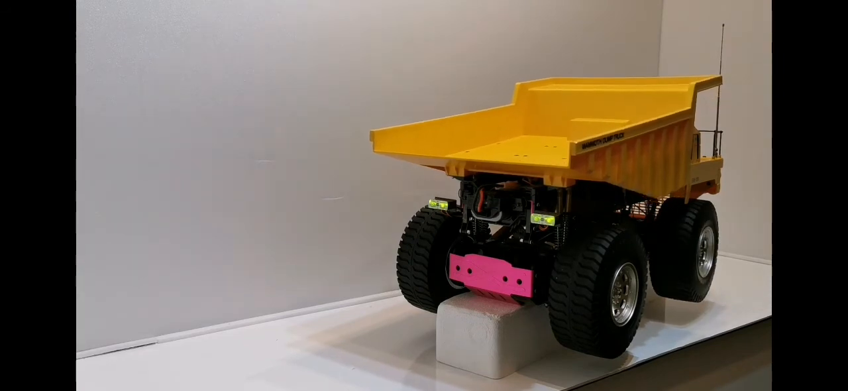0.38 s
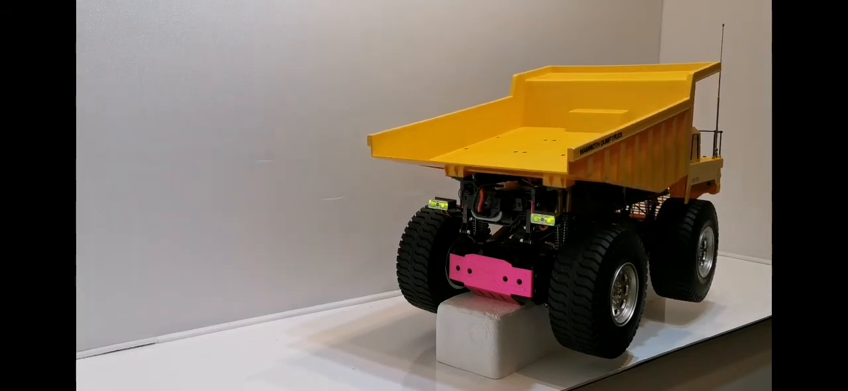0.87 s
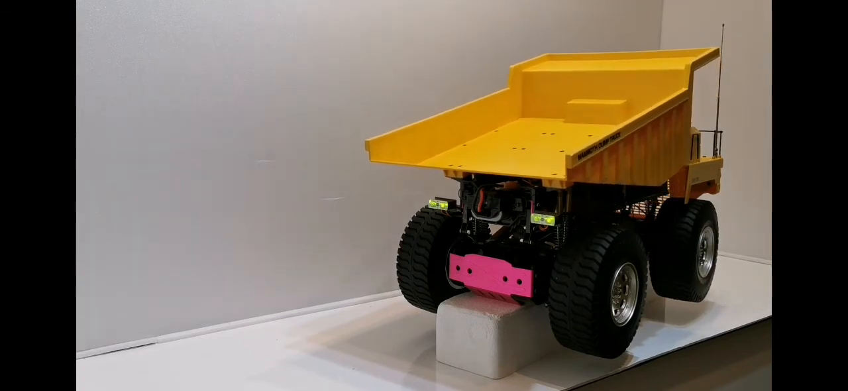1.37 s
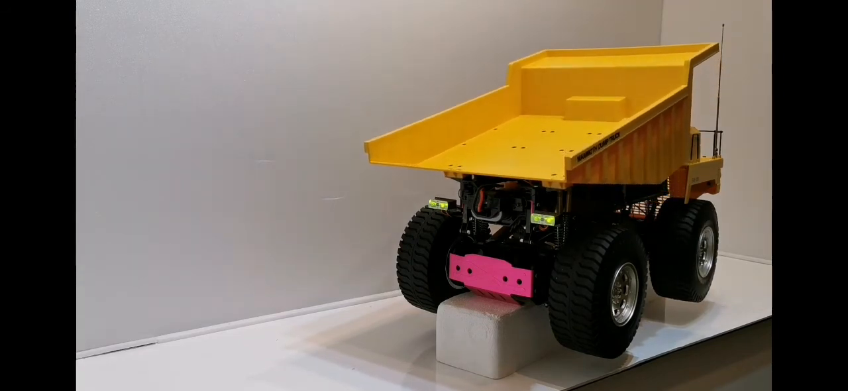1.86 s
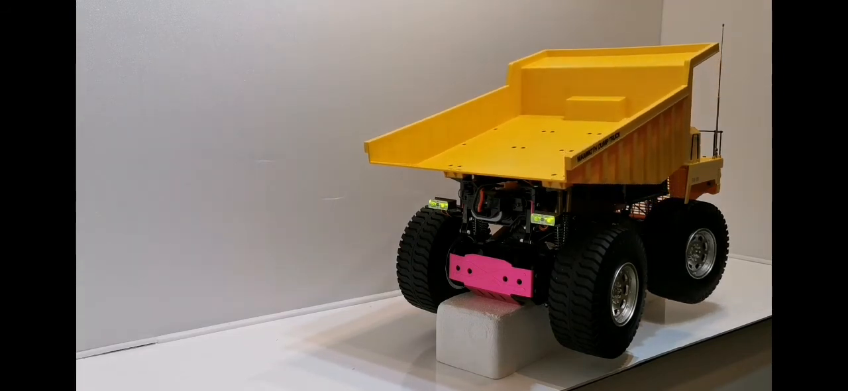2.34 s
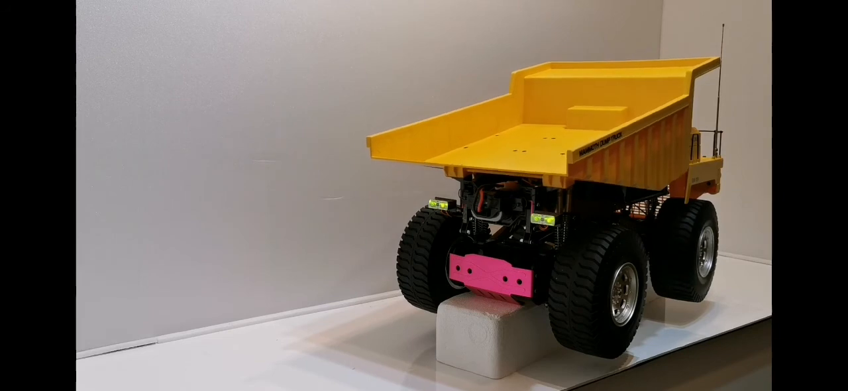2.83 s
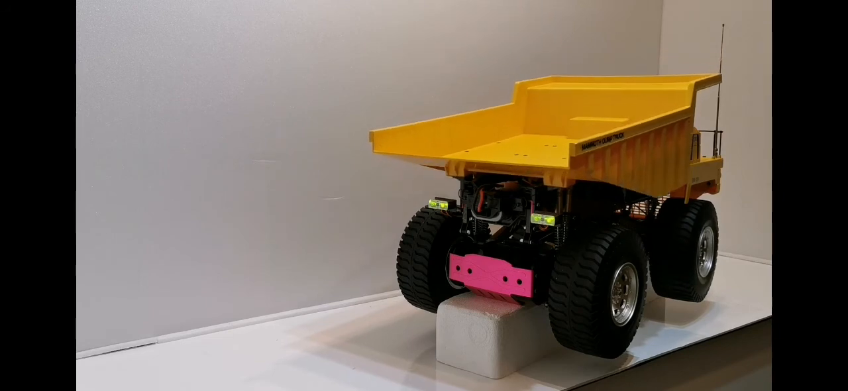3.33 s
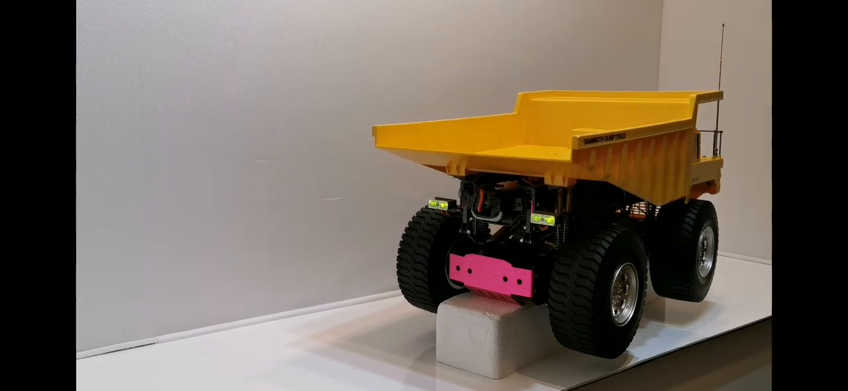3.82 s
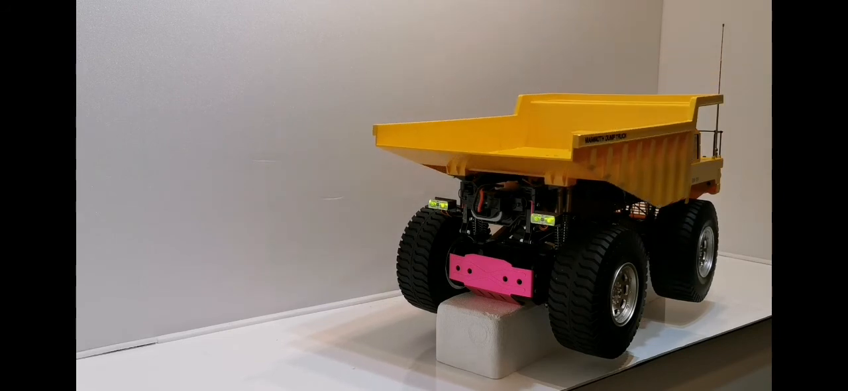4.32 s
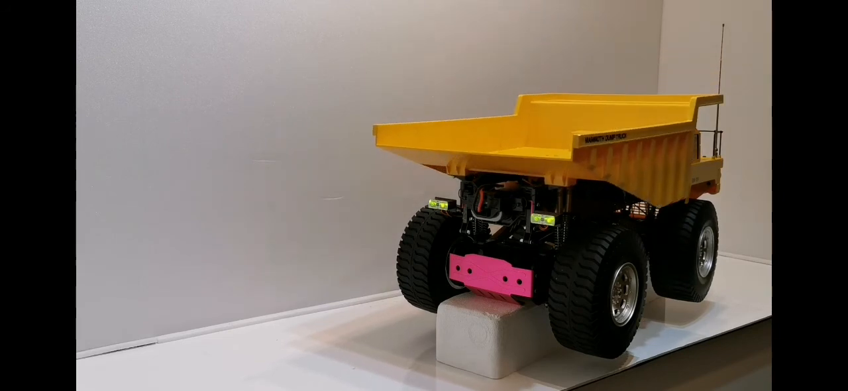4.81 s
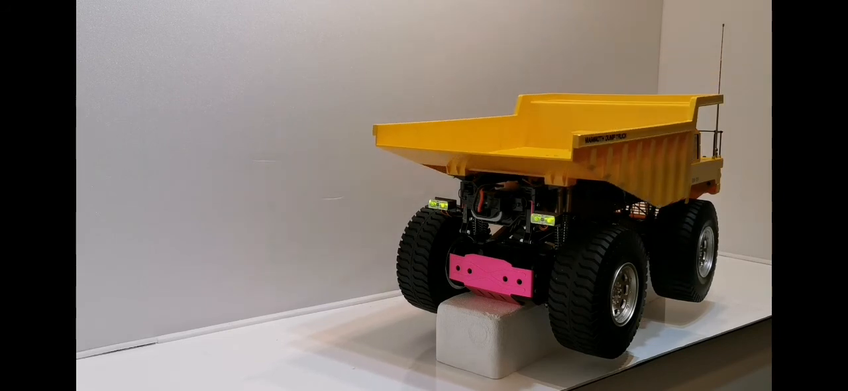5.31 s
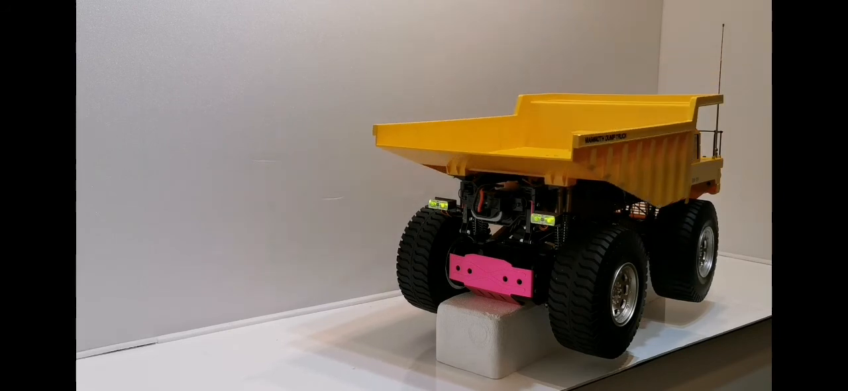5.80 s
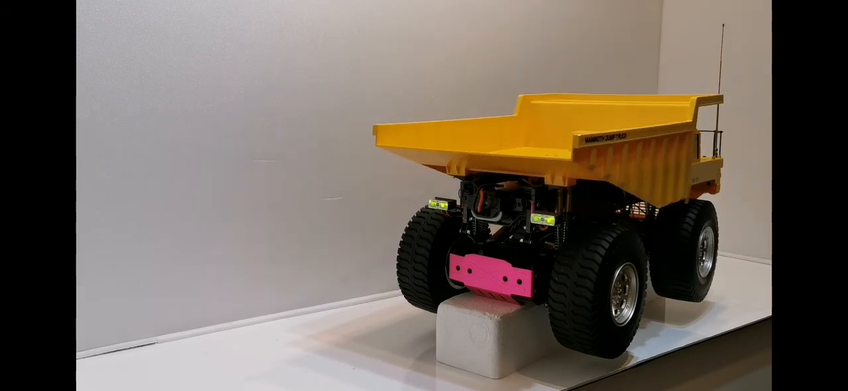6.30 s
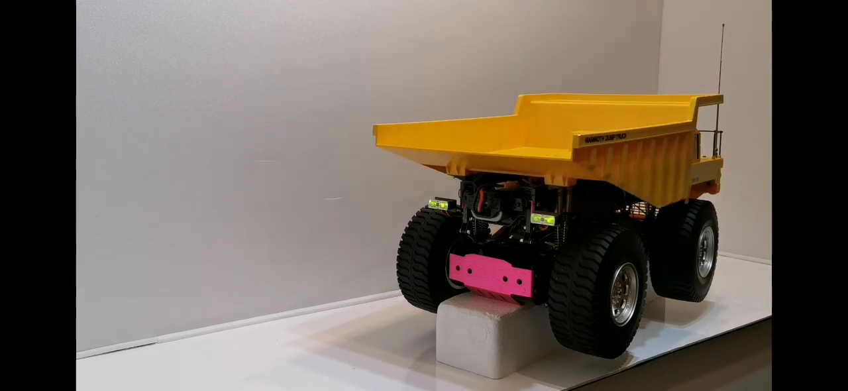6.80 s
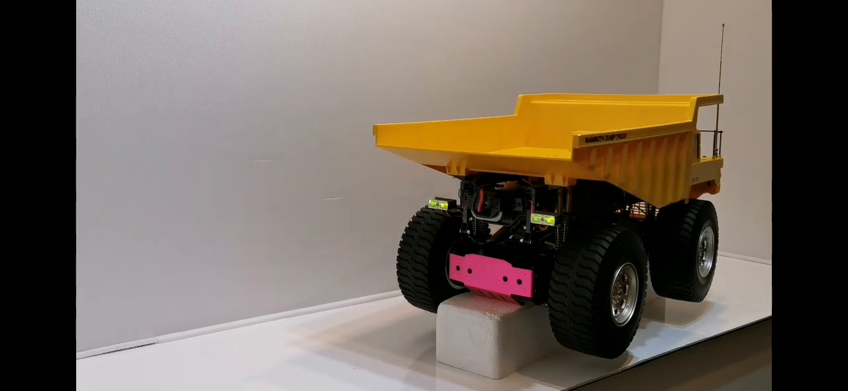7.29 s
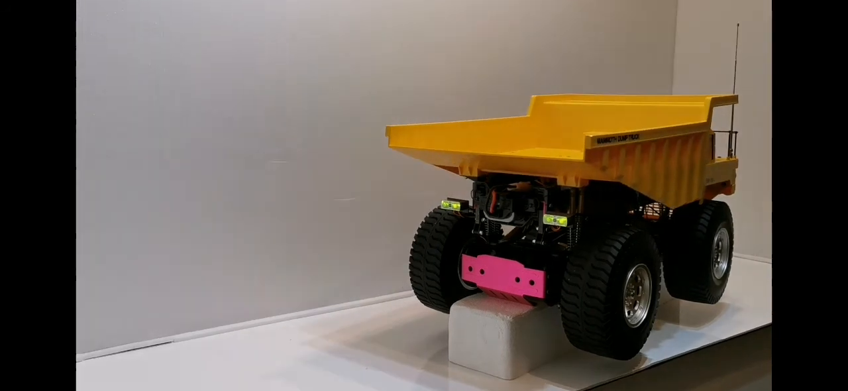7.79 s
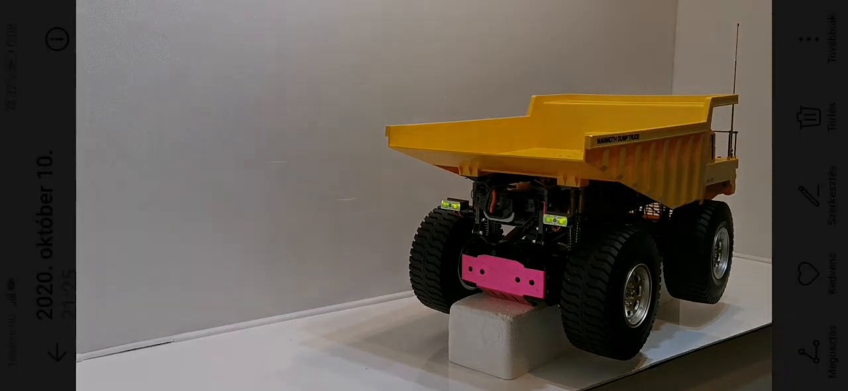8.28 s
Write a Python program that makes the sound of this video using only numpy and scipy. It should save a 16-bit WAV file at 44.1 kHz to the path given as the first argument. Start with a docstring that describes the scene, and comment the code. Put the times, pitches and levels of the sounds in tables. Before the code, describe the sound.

Close view of a model dump truck in a small bare room. A scrap of servo buzz, then a bright, gritty geared-motor whir as the bed tips up. It stops abruptly; two brief servo buzzes follow. A tiny squeal starts a second, higher and clearer whir as the bed lowers. After that, one short chattering servo buzz and faint irregular linkage clicks over low rumble and thin hiss, which grows duller at the end.

```python
"""A scrap of servo buzz, then a geared motor tips up the bed of a model dump truck and lowers it again.
The truck is on a block in a small bare room; its steering servo buzzes in short moves and skips at its stop.
Faint rattly clicks come from the linkage; banded electronics hiss, low rumble and smooth hiss lie below.
Motor: shaft-rate multiples over gear grind. Servo: dense grains. Knocks and clicks: noise bursts that ring.
Near the end clicks and banded hiss are cut off, leaving a duller floor."""
import sys
import numpy as np
from scipy import signal
from scipy.fft import rfft, irfft
from scipy.io import wavfile

SR = 44100
rng = np.random.default_rng(int(sys.argv[2]) if len(sys.argv) > 2 else 0)


def elevation(decibels):
    """Turn decibel levels (scalar or array-like) into linear amplitude ratios."""
    levels = np.asarray(decibels, float)
    return 10 ** (levels / 20)


def file_out(sig):
    """Save sig as 16-bit WAV at sys.argv[1]."""
    # one column per channel
    cols = np.atleast_2d(sig).T
    # limit, then scale
    lim = np.clip(cols, -1, 1)
    pcm = np.round(lim * 32767).astype(np.int16)
    wavfile.write(sys.argv[1], SR, pcm)


N = 370303

# Lift motor runs. Each: switch-on in seconds, switch-off in seconds.
RAISE_ON_OFF_S = (0.19, 1.964)
LOWER_ON_OFF_S = (2.79, 4.382)
# Shaft speed of each run. Each row: time in seconds, speed in turns per second.
RAISE_SPEED = [(.19, 166), (.25, 172), (.31, 180), (.39, 185.6), (.47, 187.5), (.86, 189.0), (1.12, 187.6),
               (1.65, 186.5), (1.87, 187.2), (2.16, 188.5)]
LOWER_SPEED = [(2.79, 150), (2.86, 170), (2.9, 184), (2.95, 196), (3.0, 206), (3.1, 212.1), (3.47, 212.6),
               (3.76, 211.9), (4.13, 211.7), (4.56, 212.6)]
# Shaft-rate multiples with a set level. Each row: multiple, relative level in dB.
RAISE_ORDERS = [(2, -17.5), (3, -5), (4, -3), (5, -6.5), (6, -5), (8, -13.5), (11, -10), (12, 0.5), (17, 2),
                (21, -4), (23, -6), (24, 9.5), (27, -3), (29, -2), (30, -5), (33, -7), (35, -3), (36, 9),
                (37, -2), (42, 6), (43, 3), (49, -33), (50, 0), (51, -10.5), (52, 3.5), (54, -17)]
LOWER_ORDERS = [(2, -12), (3, -12.5), (4, -6.5), (5, -14.5), (6, -10.5), (7, -16), (9, -3.5), (10, -3),
                (11, -10.5), (14, -12), (15, -5), (17, 6.5), (18, -7.5), (21, 6), (23, -1.5), (25, 5),
                (31, -12), (32, -6), (39, -9), (43, -8.5), (45, -6), (46, -3.5), (51, -12.5), (52, -13)]
# Curve for all other multiples, scattered at random. Each row: multiple, mean relative level in dB.
RAISE_REST = [(1, -27.5), (3, -12), (58, -15)]
LOWER_REST = [(1, -39.5), (5, -17.5), (24, -23), (55, -27), (72, -39.5)]
# Spectrum of the gear grind. Each row: frequency in Hz, relative density in dB per Hz.
RAISE_GRIND = [(150, -45), (250, -22), (372, -4.5), (434, -14), (544, -3), (635, -4.5), (1510, -9.5),
               (2200, 1), (3570, -7.5), (4550, -2.5), (7380, -3), (8180, -3.5), (11200, -22.5),
               (13300, -32), (15500, -37)]
LOWER_GRIND = [(150, -38.5), (250, -21.5), (420, -6.5), (781, -8.5), (852, -8), (1160, -24), (1250, -12.5),
               (1790, -16), (1890, -8.5), (2710, -6), (3700, -5), (6770, -8.5), (7380, -17.5),
               (9890, -21.5), (15500, -54.5)]
# Strain on the gears. Each row: time in seconds, strain in dB.
RAISE_STRAIN = [(0.352, 5), (.64, 1.5), (1.05, 6), (1.22, 6), (1.92, 5)]
LOWER_STRAIN = [(2.86, -14.5), (2.95, -10), (3.25, -3.5), (3.5, -2.5), (3.72, -0.5), (4.31, -2)]
# Motor parts: casing, gears, brushes, extra hum, extra whine. Each row: steady level in dB,
# share of the strain, start surge in dB, stop jolt in dB, coasting fall in dB per second.
RAISE_PARTS = [(-41, .03, 2.5, 7, 242), (-33.5, 0.082, 9, 7, 220.5), (-29.5, .03, -1, 5.5, 228),
               (4.5, 3.06, -31.5, -18, 20), (2.5, .03, -22, -9, 7.5)]
LOWER_PARTS = [(-35, 0.46, -8.5, 8, 260), (-27, 0.93, 22.5, -1, 245), (-36, -.1, 8.5, 3.5, 420),
               (8, 1.7, -1.5, -6, 5), (4.5, 1.3, 5.5, -9.5, 5)]
# Edges in Hz between casing, gears and brushes.
LIFT_SPLIT_HZ = [2800, 7200]
# Squeal as the lowering starts. Each row: time in seconds, level in dB.
SQUEAL = [(2.8, -54), (2.832, -27), (2.95, -49)]
# Its resonances. Each row: frequency in Hz, width in Hz, relative level in dB.
SQUEAL_MODES = [(3855, 100, -3.5), (7850, 900, 6)]
# Servo moves. Each row: start in seconds, rise in seconds, stop in seconds, level below and above
# the split in dB.
SERVO_MOVES = [(0.0, 0.00047, 0.02, -39, -38.5), (2.3, 0.096, 2.47, -39, -28.5),
               (2.49, .08, 2.62, -42.5, -34.5), (5.266, 0.02, 5.375, -34, -32)]
# Edge in Hz between the two servo bands.
SERVO_SPLIT_HZ = [3500]
# Servo level loss during and after a move. Each: dB per second below the split, dB per second above.
SERVO_SAG_DB_PER_S = [24, 51]
SERVO_FALL_DB_PER_S = [231, 214]
# Spectrum of the servo. Each row: frequency in Hz, relative density in dB per Hz.
SERVO_TONE = [(150, -55.5), (250, -19), (563, -4.5), (897, -8.5), (1050, -24.5), (1180, -4), (1700, -5.5),
              (2570, 2.5), (3630, -7), (4550, 2), (7130, 1), (8040, 5.5), (11200, -22.5), (14000, -49.5),
              (15500, -61)]
# Gear slack taken up. Each row: time in seconds, relative strength in dB, ring in Hz.
KNOCKS = [(0.2494, -23, 2270), (0.291, -23.5, 3420), (1.9482, -19, 2600), (2.358, -27.5, 2300),
          (2.4194, -34.5, 2300), (2.4474, -25, 2200), (2.5546, -34, 1850), (2.816, -36.5, 1054),
          (2.939, -24.5, 2640), (3.0204, -24, 2340), (4.37, -20.5, 2230), (6.998, -49, 2300)]
# Linkage twitches. Each row: time in seconds, relative strength in dB, extra for the low modes in dB,
# brightness in dB.
TWITCHES = [(0.128, -31.5, -16, -7), (2.2643, -31, -21, -4.5), (4.91, -34, -22, 2),
            (4.969, -34, -14.5, -2.5), (5.0382, -30, -21, -4.5), (5.1244, -30.5, -12.5, -3.5),
            (5.8644, -37.5, -21, -29), (5.878, -42, -19, -7), (6.0343, -43, -17, 0.5),
            (6.218, -32, -24, -3), (6.5334, -37.5, -10, 5), (6.5753, -35, -3, 5), (6.773, -34.5, -20, 9.5),
            (6.857, -31.5, -14, 5), (7.1298, -29.5, -25, 2.5), (7.1533, -47, -21, -5),
            (7.26, -30.5, -17, -1), (7.3014, -32, -7.5, 6), (7.442, -33, -4, 1.5), (7.463, -31.5, -24, -4),
            (7.5028, -26.5, -5, 2), (7.7554, -41.5, -8, -4), (7.8827, -27.5, -20, -2),
            (7.9859, -34, -12, -2.5)]
# Linkage modes. Each row: frequency in Hz, width in Hz, relative level in dB.
LINKAGE = [(1410, 17, 4.5), (2360, 37, -29), (2703, 29, -2), (3020, 59, 9.5), (3298, 23, -2.5),
           (3180, 44, -3), (4310, 170, -4.5), (4570, 260, 2), (5056, 66, 2), (5390, 35, -3), (5880, 48, -1),
           (6840, 240, -11), (8250, 160, -17), (9050, 87, -37.5), (9530, 43, -72), (10900, 150, -58)]
# Edges in Hz between low, main, upper and top linkage modes.
LINKAGE_SPLIT_HZ = [2550, 3700, 6200]
# Plastic casing resonances. Each row: frequency in Hz, width in Hz, lift in dB.
CASING = [(534, 38, 3.5), (1163, 270, 1.5), (2300, 31, 0.5), (2200, 14, 4), (3173, 190, 4.5),
          (3870, 148, 5.5), (4572, 230, 9), (6860, 530, 7.5), (8120, 420, 6), (9480, 200, 6.5),
          (10850, 300, 10.5), (14900, 670, 3)]
# Level of the low rumble. Each row: time in seconds, level in dB.
RUMBLE_DB = [(0.0, -75.5), (1.85, -76), (2.0, -71), (4.23, -70), (4.6, -58.5), (5.4, -68.5), (8.0, -66),
             (8.4, -60)]
# Spectrum of the rumble. Each row: frequency in Hz, relative density in dB per Hz.
RUMBLE = [(12, -28.5), (20, -1.5), (48, 2.5), (97, -12), (145, 1), (182, -10), (248, -4), (400, -14.5),
          (520, -48.5), (880, -120)]
# Level of the idling electronics. Each row: time in seconds, level in dB.
HISS_DB = [(0, -76), (4.5, -64.5), (6.0, -68), (8.4, -59)]
# Spectrum of their hiss. Each row: frequency in Hz, relative density in dB per Hz.
HISS = [(350, -41.5), (600, -13), (885, -9.5), (1050, -23.5), (1240, -11), (1360, -20.5), (2380, -8),
        (2670, -12.5), (3510, -24), (4510, -18), (7090, -31), (7740, -29), (8880, -24.5), (11000, -29.5),
        (12000, -39.5), (15600, -51), (22000, -120)]
# Fixed dips in the colour of the sound. Each row: frequency in Hz, width in Hz, depth in dB.
DIPS = [(7250, 590, -25), (8720, 190, -25), (10310, 360, -22), (13950, 600, -35.5)]
# Spectrum of the microphone hiss. Each row: frequency in Hz, relative density in dB per Hz.
MIC_HISS = [(180, -11), (300, -13.5), (554, -9), (734, -19.5), (852, -10.5), (1060, -17.5), (3600, -30),
            (15700, -31)]

BITE_S, BITE_DB = 0.027, 38.5   # drive takes hold
SURGE_S, JOLT_S, COAST_S = 0.068, 0.024, 0.19
FLUTTER_DB, SCATTER_DB = 1.0, 3.0   # unsteadiness of the grind; spread of the unset multiples
RUN_UP_FADE_IN_S = 0.09
SERVO_RISE_DB = 21
CHATTER_PER_S, CHATTER_WIDTH_HZ, CHATTER_DB = 50, 110, -6
SKIP_START_S, SKIP_GAP_S, SKIP_SHORTER_S = 5.2905, 0.020, 0.002
SKIP_DB, SKIP_LOSS_DB, SKIP_RING_HZ = -12, 1.2, 2550
KNOCK_RING_DB, SKIP_RING_DB, KNOCK_FALL_S = 6, -1, 0.0027
UPPER_SHARE, TOP_SHARE = 0.93, 1.3   # of the twitch brightness
ROOM_EARLY_T60_S, TAIL_CUT_S = 0.26, 0.14   # early slope; time at which the cut has taken 10 dB
CUT_S = 8.04


def lift_motor(out, on_off, strain, parts, speed_curve, orders, grind,
               wobble_turns, waver_db, gate, whine_db, run_up_db, hum_top):
    """Multiples of the shaft rate over gear grind that swells once a turn."""
    first, size = round(on_off[0] * SR), round((on_off[1] - on_off[0] + COAST_S) * SR)
    t = (first + np.arange(size)) / SR
    *levels_db, more_hum_db, more_whine_db = lift_levels(t, on_off, strain, parts)
    speed = np.interp(t, *np.transpose(speed_curve))
    turns = np.cumsum(speed) / SR + wobble_turns * drift(7, size)   # uneven load blurs high multiples
    lines = []
    for k, db in orders:
        waver = waver_db * min(k / 15, 1) * drift(6.9, size)
        lines.append(elevation(db + waver) * np.sin(2 * np.pi * (k * turns + rng.random())))
    hum = sum(lines[1:hum_top])   # multiples 2 to hum_top
    whine = lines[0] + sum(lines[hum_top:])
    slipping = np.clip(1 - speed / np.median(speed), 0, 1)
    more_whine_db = more_whine_db - 450 * slipping   # no clean whine until the gears run at speed
    tones = (elevation(more_hum_db) * hum + elevation(more_whine_db) * whine) / np.std(hum + whine)
    # the third multiple sings on the run-up
    fade_in = np.clip((t - on_off[0]) / RUN_UP_FADE_IN_S, 0, 1) ** 2
    tones = tones + elevation(run_up_db) * np.sqrt(slipping) * fade_in * rms_one(lines[2])
    teeth = grains(size, 9000, 1.6) * (1 + gate * np.cos(2 * np.pi * turns)) * elevation(1.0 * drift(33, size))
    grinding = coloured(casing(teeth + elevation(-4.0) * room(teeth)), grind)
    add(out, first, in_bands(elevation(whine_db) * tones + grinding, LIFT_SPLIT_HZ, levels_db))


def lift_levels(t, on_off, strain, parts):
    """Level of each motor part: surge, strain, jolt and coasting; bite and flutter on the first three."""
    since, left = t - on_off[0], on_off[1] - t
    bite_db = -BITE_DB * np.clip(1 - since / BITE_S, 0, 1)
    strain_db = np.interp(t, *np.transpose(strain))
    surge, jolt = np.exp(-since / SURGE_S), np.exp(-np.maximum(left, 0) / JOLT_S)
    levels_db = [db + share * strain_db + surge_db * surge + jolt_db * jolt + fall * np.minimum(left, 0)
                 for db, share, surge_db, jolt_db, fall in parts]
    return [db + bite_db + FLUTTER_DB * drift(4.0, len(t)) for db in levels_db[:3]] + levels_db[3:]


def all_orders(strong, rest):
    """Every multiple of the shaft rate with its level."""
    k = np.arange(1, int(rest[-1][0]) + 1)
    db = np.interp(k, *np.transpose(rest)) + SCATTER_DB * rng.standard_normal(len(k))
    for order, strong_db in strong:
        db[int(order) - 1] = strong_db
    return zip(k, db)


def squeal(out):
    """Slipping gears squeal briefly under the starting load: noise through narrow resonances."""
    first, (level_db,) = span_of(SQUEAL)
    slip = rng.standard_normal(len(level_db))
    ring = sum(elevation(db) * rms_one(resonance(resonance(slip, hz, width), hz, width))
               for hz, width, db in SQUEAL_MODES)
    fade_out = np.clip(np.arange(len(ring))[::-1] / (0.025 * SR), 0, 1)
    add(out, first, elevation(level_db) * fade_out * ring)


def servo(out):
    """Fast small gears: dense grains that rise, sag while the move lasts and run down."""
    for start, rise, stop, *peaks_db in SERVO_MOVES:
        size = round((stop - start + COAST_S) * SR)
        t = np.arange(size) / SR
        rise_db = -SERVO_RISE_DB * np.clip(1 - t / rise, 0, 1)
        sagging_s = np.clip(t - rise, 0, max(stop - start - rise, 0))
        falling_s = np.maximum(t - stop + start, 0)
        levels_db = [db + rise_db - sag * sagging_s - fall * falling_s
                     for db, sag, fall in zip(peaks_db, SERVO_SAG_DB_PER_S, SERVO_FALL_DB_PER_S)]
        buzz = grains(size, 6000, 1.33) * elevation(2.0 * drift(51, size))
        # single teeth catch and ring
        catches = sum(resonance(grains(size, CHATTER_PER_S, 1.9), hz, CHATTER_WIDTH_HZ)
                      for hz in np.geomspace(1500, 4800, num=7))
        buzz = rms_one(buzz) + elevation(CHATTER_DB) * rms_one(catches)
        buzz = coloured(casing(buzz + elevation(-6.0) * room(buzz)), SERVO_TONE)
        add(out, round(start * SR), in_bands(buzz, SERVO_SPLIT_HZ, levels_db))


def knocks():
    """Dull plastic knocks inside the gear trains, each a noise burst with a short ring of its own."""
    # the servo gear skips at its stop, ever faster and weaker
    skips = [(SKIP_START_S + k * SKIP_GAP_S - k * (k - 1) / 2 * SKIP_SHORTER_S,
              SKIP_DB - k * SKIP_LOSS_DB, SKIP_RING_HZ) for k in range(6)]
    s, burst_db, ring_hz = np.transpose(KNOCKS + skips)
    bursts = puffs(s, burst_db, 0.0002, KNOCK_FALL_S) * rng.standard_normal(N)
    body = signal.butter(3, [500, 9500], "band", fs=SR, output="sos")
    out = signal.sosfilt(body, casing(bursts))
    ring_db = burst_db + np.where(np.arange(len(s)) < len(KNOCKS), KNOCK_RING_DB, SKIP_RING_DB)
    t = np.arange(round(0.04 * SR)) / SR
    envelope = np.exp(-t / 0.0036) * (1 - np.exp(-t / 0.0012))
    for at, db, hz in zip(s, ring_db, ring_hz):
        add(out, round(at * SR), elevation(db) * np.sin(2 * np.pi * hz * t) * envelope)
    return out


def twitches():
    """Each twitch shakes the linkage for some ms and rings its modes, each with a strength of its own."""
    s, main_db, low_db, bright_db = np.transpose(TWITCHES)
    groups_db = [main_db + low_db, main_db, main_db + UPPER_SHARE * bright_db, main_db + TOP_SHARE * bright_db]
    luck_db = 2.7 * rng.standard_normal((len(s), len(LINKAGE)))
    shake = rng.standard_normal(N) * elevation(1.5 * drift(90, N))   # uneven contacts
    settle = rng.standard_normal(N) * elevation(2.3 * drift(50, N))   # loose parts rattle on
    out = np.zeros(N)
    for k, (hz, width, db) in enumerate(LINKAGE):
        mode_db = groups_db[np.searchsorted(LINKAGE_SPLIT_HZ, hz)] + db + luck_db[:, k]
        burst = shake * puffs(s, mode_db + 8, 0.0032, 0.0057)
        burst += settle * puffs(s, mode_db - 1.5, 0.0071, 0.021)
        wide = 1.9 * width + 150
        out += resonance(resonance(burst, hz, wide), hz, wide)   # twice: little sounds between the modes
    return out


def puffs(times, strengths_db, rise_s, fall_s):
    """The swell and fall of a short burst of contacts for each event."""
    clicks = np.zeros(N)
    clicks[np.round(np.asarray(times) * SR).astype(int)] = elevation(np.asarray(strengths_db))
    swell = signal.lfilter([1 / (rise_s * SR)], [1, -np.exp(-1 / (rise_s * SR))], clicks + 1e-18)
    return signal.lfilter([1], [1, -np.exp(-1 / (fall_s * SR))], swell)


def grains(size, per_s, spread_db):
    """Random contacts of uneven strength."""
    sizes = elevation(spread_db * np.minimum(rng.exponential(1, size), 5)) * rng.choice([-1, 1], size)
    return sizes * (rng.random(size) < per_s / SR)


def casing(x):
    """Each resonance of the plastic casing lifts its band."""
    for hz, width, db in CASING:
        x = x + (elevation(db) - 1) * resonance(x, hz, width)
    return x


def room(x):
    """Dense reflections, their tails cut short."""
    t = np.arange(round(0.4 * SR)) / SR
    decay_db = -60 * t / ROOM_EARLY_T60_S - 10 * (t / TAIL_CUT_S) ** 4
    echoes = rng.standard_normal(len(t)) * elevation(decay_db) * (t > 0.004)
    return signal.fftconvolve(x, echoes / np.sqrt(np.sum(echoes ** 2)))[:len(x)]


def background(before_cut):
    """Low rumble and the faint banded hiss of the electronics, both shaped noise."""
    (rumble_db,), (hiss_db,) = span_of(RUMBLE_DB)[1], span_of(HISS_DB)[1]
    rumble_db = np.resize(rumble_db, N) + 2.0 * drift(1.5, N)
    rumble = elevation(rumble_db) * coloured(rng.standard_normal(N), RUMBLE)
    hiss = elevation(np.resize(hiss_db, N)) * coloured(casing(rng.standard_normal(N)), HISS)
    return rumble + before_cut * hiss


def rms_one(x):
    """Scales to an rms of 1."""
    return x / np.sqrt(np.mean(x ** 2) + 1e-20)


def span_of(rows):
    """First sample and the curves of a table, interpolated at every sample."""
    s, *columns = np.transpose(rows)
    first = round(s[0] * SR)
    t = np.arange(first, min(round(s[-1] * SR), N)) / SR
    return first, [np.interp(t, s, c) for c in columns]


def add(out, first, x):
    """Mixes x into out from sample first on."""
    out[first:first + len(x)] += x


def coloured(x, spectrum):
    """Filters x by a curve in dB over log frequency; rms 1."""
    hz, db = np.transpose(spectrum)
    bins_hz = np.arange(len(x) // 2 + 1) * SR / len(x) + 1   # +1 keeps the log finite
    gain = elevation(np.interp(np.log(bins_hz), np.log(hz), db))
    return rms_one(irfft(rfft(x) * gain, len(x)))


def drift(corner_hz, size):
    """Slow chance of spread 1: noise at every 40th sample through a double one-pole low-pass."""
    r = np.exp(-80 * np.pi * corner_hz / SR)
    slow = signal.lfilter([1], [1, -2 * r, r * r], rng.standard_normal(size // 40 + 1002))[1000:]
    return np.interp(np.arange(size) / 40, np.arange(len(slow)), rms_one(slow))


def in_bands(x, edges_hz, levels_db):
    """Splits x at the edges and sets each part to its own level curve."""
    band = np.searchsorted(edges_hz, np.arange(len(x) // 2 + 1) * SR / len(x))
    spectrum = rfft(x)
    return sum(elevation(db) * rms_one(irfft(spectrum * (band == k), len(x))) for k, db in enumerate(levels_db))


def resonance(x, hz, width_hz):
    """Two-pole band of gain about 1 at hz."""
    r = np.exp(-np.pi * width_hz / SR)
    poles = [1, -2 * r * np.cos(2 * np.pi * hz / SR), r * r]
    return signal.lfilter([(1 - r * r) / 2, 0, (r * r - 1) / 2], poles, x)


def scene():
    """All sources at one microphone."""
    twitch, knock = twitches(), elevation(-4.5) * knocks()
    # the clicks and banded hiss are cut off here, leaving a duller floor
    before_cut = np.clip((CUT_S - np.arange(N) / SR) / 0.0025, 0, 1)
    reflections = room(elevation(-2.5) * twitch + elevation(-5.5) * knock)
    out = before_cut * (twitch + knock + reflections) + background(before_cut)
    lift_motor(out, RAISE_ON_OFF_S, RAISE_STRAIN, RAISE_PARTS, RAISE_SPEED,
               all_orders(RAISE_ORDERS, RAISE_REST), RAISE_GRIND,
               wobble_turns=0.0079, waver_db=2.3, gate=0.18, whine_db=-3.0, run_up_db=-16, hum_top=2)
    lift_motor(out, LOWER_ON_OFF_S, LOWER_STRAIN, LOWER_PARTS, LOWER_SPEED,
               all_orders(LOWER_ORDERS, LOWER_REST), LOWER_GRIND,
               wobble_turns=0.001, waver_db=1.5, gate=0.31, whine_db=-1.0, run_up_db=-5, hum_top=4)
    squeal(out)
    servo(out)
    return out[None]


def top_cut(x):
    """Nothing passes above the cut-off."""
    return signal.sosfilt(signal.butter(12, 15900, fs=SR, output="sos"), x)


def record(dry):
    """Fixed dips colour the sound, then the microphone adds its own smooth hiss."""
    for hz, width, db in DIPS:
        w, half = 2 * np.pi * hz / SR, np.pi * width / SR
        zeros = [1 + half * elevation(db), -2 * np.cos(w), 1 - half * elevation(db)]
        poles = [1 + half, -2 * np.cos(w), 1 - half]
        dry = signal.lfilter(zeros, poles, dry)
    mix = dry + elevation(-69.5) * coloured(rng.standard_normal(N), MIC_HISS)
    return top_cut(mix)


dry = scene()
out = record(dry)
file_out(out)
```